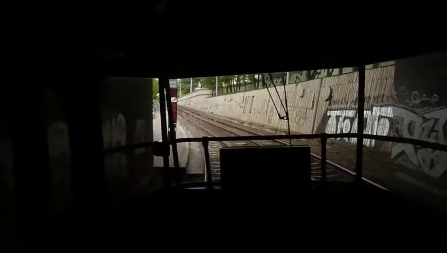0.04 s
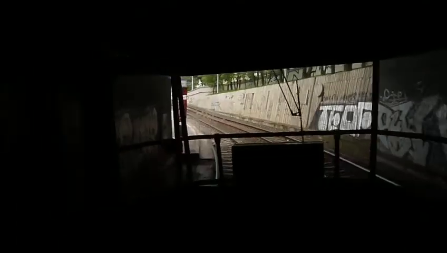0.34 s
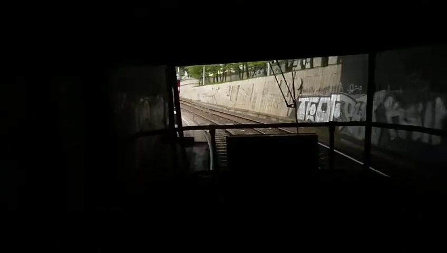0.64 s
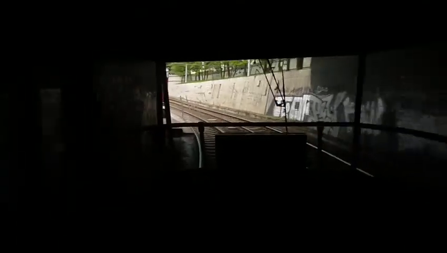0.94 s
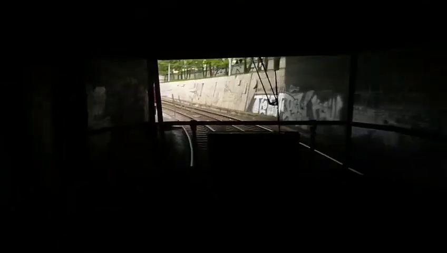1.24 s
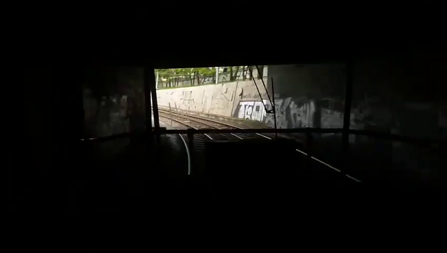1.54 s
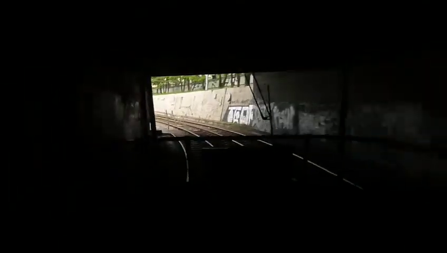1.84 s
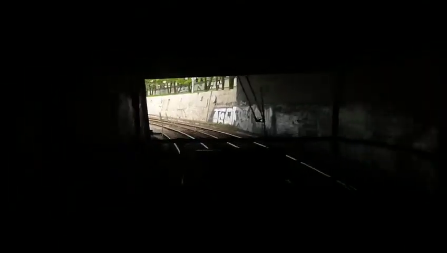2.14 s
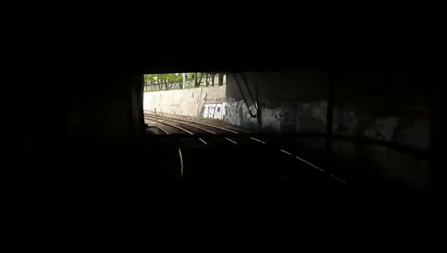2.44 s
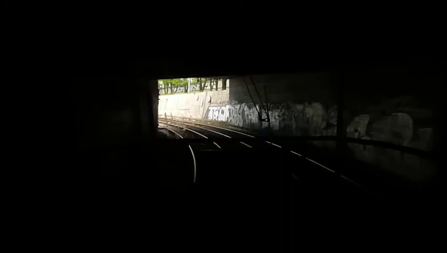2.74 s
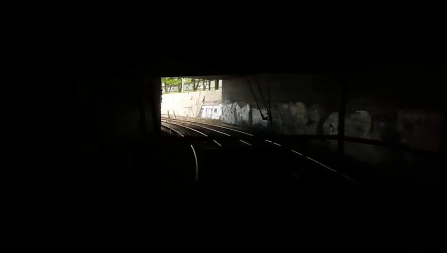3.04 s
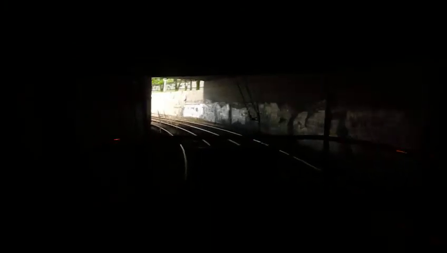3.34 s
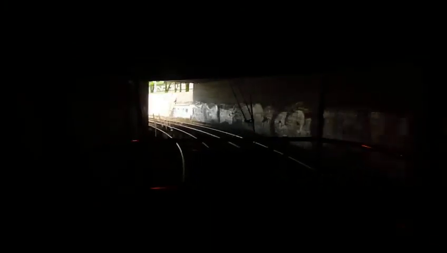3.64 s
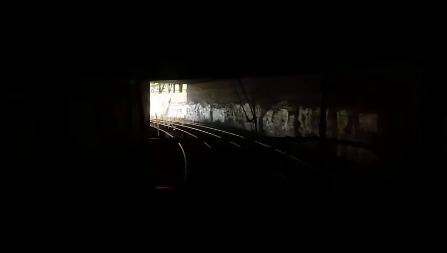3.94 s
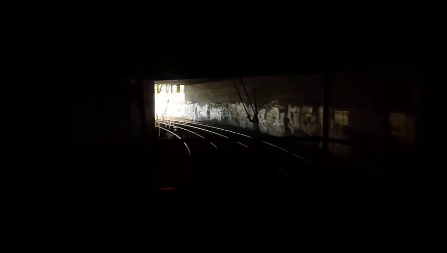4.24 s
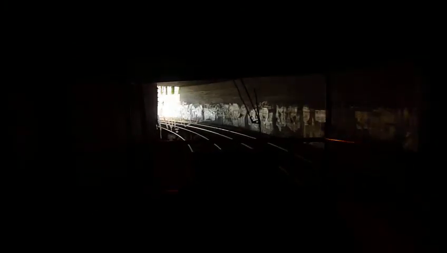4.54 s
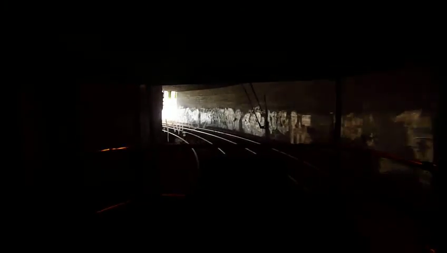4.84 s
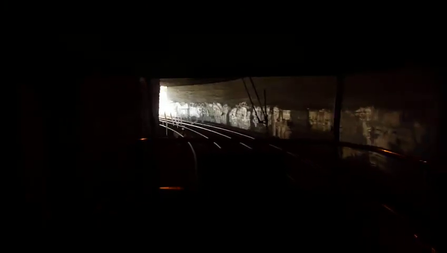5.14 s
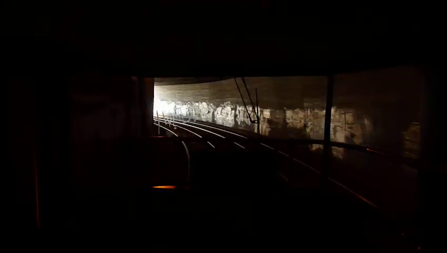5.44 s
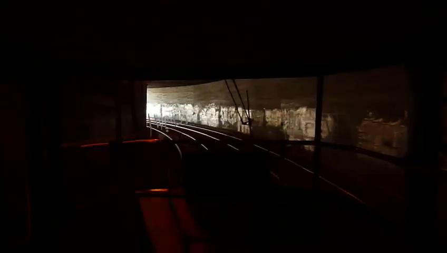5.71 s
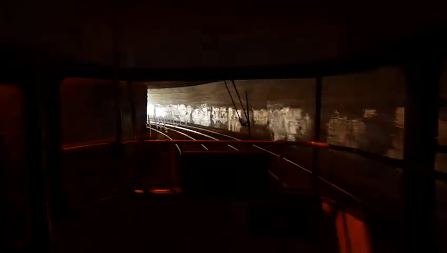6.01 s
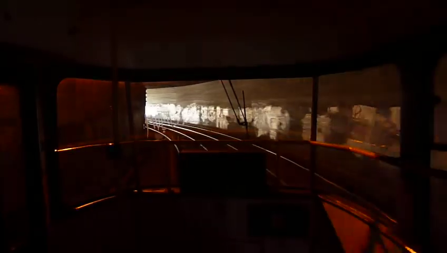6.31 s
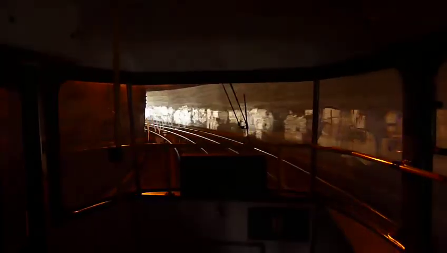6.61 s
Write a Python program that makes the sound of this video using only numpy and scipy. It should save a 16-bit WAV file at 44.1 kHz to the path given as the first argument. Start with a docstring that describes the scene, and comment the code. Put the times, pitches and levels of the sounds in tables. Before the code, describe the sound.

Inside a moving tram, an even low rumble and wheel roar carry on, with light knocks and faint metallic singing from the rails.

```python
"""Inside a tram that rolls at an even pace round a bend into a tunnel.
Rough rails shake the body into a deep rumble, and the air in the car booms. The wheels roar,
hiss and sing faintly in the curve, over a thin whine. Uneven spots give soft thumps and knocks.
A flange (the lip of a wheel) brushes the rail and, near the end, gives a thin double squeak."""
import sys
import numpy as np
from scipy.fft import rfft, irfft, next_fast_len
from scipy.io import wavfile
from scipy.ndimage import map_coordinates

SR = 44100
rng = np.random.default_rng(int(sys.argv[2]) if len(sys.argv) > 2 else 0)


def inscribe(sig):
    """Save sig as 16-bit PCM at rate SR to the path in sys.argv[1].

    A 1-D sig is mono; a 2-D sig holds one channel per row.
    Samples are clipped to [-1, 1] before scaling.
    """
    pcm = np.round(np.clip(np.atleast_2d(sig).T, -1, 1) * 32767)
    wavfile.write(sys.argv[1], SR, pcm.astype(np.int16))


N = 298424
T = np.arange(N) / SR


def body(rough_db):
    """Rough rail shakes the floor and wall panels into a deep rumble."""
    # The body shakes more or less on its springs. Each row: time in seconds, change in dB.
    sway = [(0, 2), (0.15, -1), (0.5, 1), (0.95, 1), (1.03, -2.5), (1.2, 1), (1.5, -2), (1.8, -0.5),
            (2.1, 0), (2.5, -0.5), (3.4, 0), (3.72, 1.5), (3.85, -4), (4.1, 0), (4.5, 0.5), (4.9, -0.5),
            (5.15, 1), (5.45, -0.5), (5.9, -0.5), (6.77, 0.5)]
    # Tone of the rumble. Each row: frequency in Hz, relative level in dB.
    rumble = [(10, -28.5), (22, -15), (42, -20.5), (55, -3), (100, -2), (250, 0), (400, -5.5), (530, -14.5),
              (900, -33), (2000, -64)]
    # Ringing panels. Each row: pitch in Hz, width in Hz, relative level in dB.
    panels = [(31, 6.5, -3.5), (59, 10, 3.5), (116.5, 20, 0.5), (181.6, 10, 1.5), (203, 14, -0.5),
              (259.8, 9, 0), (283.6, 8.3, -1), (346.4, 26, -3.5), (397, 16, -6), (466, 11, -4)]
    level_db = -30 + 0.8 * rough_db + curve(sway)
    shake = amp(-1.5) * noise(colour(rumble)) + amp(-2.5) * noise(resonances(panels))
    return amp(level_db + 0.32 * wobble(8.3)) * shake


def rolling(rough_db):
    """The wheels roar on the rail and make the steel ring."""
    # Tone of the roar. Each row: frequency in Hz, relative level in dB.
    roar = [(200, -17.5), (500, 2.5), (700, 3.5), (880, 1.5), (1100, -5.5), (1300, -4), (1720, -3),
            (1900, -7.5), (2300, -12.5), (3000, -29.5), (5000, -56.5)]
    # Ringing wheels and rails. Each row: pitch in Hz, width in Hz, relative level in dB.
    steel = [(587, 9.3, 8.5), (627, 20, 11), (703, 32, 4.5), (750, 8.9, 1.5), (874, 11, 1.5),
             (1206, 30, -8), (1287, 10, -4.5), (1397, 28, 0.5), (1506, 150, -4), (2913, 63, -10.5),
             (3215, 41, -14)]
    sound = amp(2.5) * noise(colour(roar)) + amp(-2.5) * noise(resonances(steel))
    return amp(-39 + rough_db + 0.51 * wobble(11)) * sound


def cabin():
    """The air in the car booms at two low pitches."""
    # Strength of each boom. Each row: time in seconds, level in dB.
    lower_boom = [(0, -40.5), (1.5, -38.5), (3.75, -37), (4.8, -39), (5.2, -35.5), (6.77, -35)]
    upper_boom = [(0, -44.5), (2.4, -38), (4.5, -43), (4.78, -38.5), (4.96, -30.5), (5.2, -41), (5.65, -36),
                  (5.92, -40.5), (6.12, -32.5), (6.42, -36.5), (6.7, -30)]
    lower = amp(curve(lower_boom)) * drone(hz=74.9, width_hz=4.95, swing_db=3.5)
    upper = amp(curve(upper_boom)) * drone(hz=135.1, width_hz=4.27, swing_db=2.5)
    return lower + upper


def bumps(rise_s=0.011, fade_s=0.074, ring_db=-3, shudder_db=-5):
    """Each uneven spot on the rail makes one panel ring briefly inside a dull shudder."""
    # Soft blows. Each row: start in seconds, length in seconds, level in dB, pitch in Hz.
    blows = [(0.363, 0.046, -25.5, 269), (0.558, 0.047, -28, 123), (0.63, 0.037, -29, 114),
             (0.686, 0.046, -26, 99.5), (0.88, 0.033, -29, 207), (1.477, 0.063, -29, 69),
             (1.784, 0.045, -28, 236), (1.975, 0.072, -29.5, 199), (2.115, 0.023, -26, 131),
             (2.365, 0.04, -24, 203), (2.829, 0.033, -27, 251), (2.818, .1, -32, 71.2),
             (3.472, 0.034, -28, 247), (3.59, 0.034, -29, 283), (3.685, 0.043, -28.5, 110),
             (3.719, .08, -29.5, 71.7), (3.941, .05, -27, 72), (4.055, 0.032, -26.5, 214),
             (4.298, 0.03, -23, 276), (5.305, 0.052, -27.5, 188), (5.985, 0.036, -28, 136),
             (6.586, 0.037, -28, 289)]
    out = np.zeros(N)
    for start, length, db, hz in blows:
        near = (T >= start) & (T < start + length + 2 * fade_s)
        age = T[near] - start
        ring = unit(np.sin(2 * np.pi * hz * age))
        shudder = noise(resonances([(hz, 0.57 * hz, 0), (2 * hz, hz, -17)]))[near]
        rise = 1 - np.exp(-age / rise_s)
        fade = amp(db - 60 * np.maximum(age - length, 0) / fade_s)
        out[near] += rise * fade * (amp(ring_db) * ring + amp(shudder_db) * shudder)
    return out


def clacks():
    """A wheel strikes hard spots and knocks through the frame that holds it."""
    # The knocks. Each row: start in seconds, length in seconds, level in dB.
    knocks = [(.365, 0.056, -36.5), (1.809, 0.043, -35), (2.02, 0.045, -33.5), (2.914, 0.062, -32.5),
              (4.292, 0.055, -34.5), (5.207, 0.038, -36)]
    # Tone of a knock. Each row: frequency in Hz, relative level in dB.
    knock_tone = [(250, -23), (500, -5), (640, 1), (900, -5), (1200, -15.5), (2500, -25), (5000, -37.5),
                  (7000, -55.5)]
    return swells(knocks) * noise(colour(knock_tone))


def chirps(stray_hz=14, flutter_db=2):
    """The flanges set the wheels singing in brief notes that sometimes overlap."""
    # The notes. Each row: start in seconds, length in seconds, level in dB, pitch in Hz.
    notes = [(.09, .1, -42, 1530), (1.46, 0.09, -57, 4130), (1.87, 0.3, -46.5, 1560),
             (2.04, .12, -55, 4120), (2.61, .1, -56, 4160), (4.08, .1, -59, 4180),
             (4.965, 0.098, -55, 4130), (4.965, 0.062, -42, 1760), (5.08, 0.12, -48, 1545),
             (5.12, 0.14, -45.5, 1650), (5.31, .07, -43, 1410), (5.425, 0.1, -43, 1540),
             (5.827, 0.079, -42, 1400), (5.968, 0.13, -39, 1405), (6.03, .08, -41, 1530)]
    stray = 2 * np.pi * np.cumsum(stray_hz * wobble(90)) / SR
    tones = sum(amp(db) * arch(start, length) * np.sin(2 * np.pi * hz * T + stray)
                for start, length, db, hz in notes)
    return amp(flutter_db * wobble(60)) * tones


def scrub(rough_db):
    """The wheels slip sideways in the bend and hiss; a brushing flange adds short scrapes."""
    # Tones of the hiss and the scrapes. Each row: frequency in Hz, relative level in dB.
    hiss_tone = [(1000, -23), (2000, 3.5), (2800, 0.5), (3600, -3.5), (4400, -5), (4900, -9.5), (5600, -11),
                 (6200, -17.5), (6750, -22.5), (7100, -31), (7500, -44)]
    scrape_tone = [(1000, -21.5), (2100, 4), (2900, 0), (3800, -7.5), (5500, -14), (6500, -21.5),
                   (7500, -42.5)]
    # High wheel notes stirred by the slip. Each row: pitch in Hz, width in Hz, relative level in dB.
    high_notes = [(3830, 50, 0), (5100, 77, -4.5), (5410, 90, -5.5)]
    # The flange brushes the rail. Each row: start in seconds, length in seconds, level in dB.
    scrapes = [(0.85, 0.082, -50), (1.002, 0.21, -51.5), (1.3, 0.1, -52), (1.773, 0.22, -49),
               (2.51, 0.17, -50.5), (2.715, 0.14, -47), (2.955, 0.064, -50)]
    level_db = -49.5 + 0.91 * rough_db + 0.62 * wobble(16)
    hiss = noise(colour(hiss_tone)) + amp(-20.5) * noise(resonances(high_notes))
    return amp(level_db) * hiss + swells(scrapes) * noise(colour(scrape_tone))


def gears(rough_db):
    """A faint whine, most likely from the drive gears, flutters behind the roar."""
    return amp(-53.5 + 0.91 * rough_db) * drone(hz=1545, width_hz=24, swing_db=3)


def squeak(full_grip_hz=5680, sag_hz=110, stutter_db=2):
    """A flange catches the rail twice and rings a high note that sags as the grip lets go."""
    # The catches. Each row: start in seconds, length in seconds, level in dB.
    catches = [(6.645, 0.027, -57), (6.688, 0.058, -57)]
    grip = sum(arch(start, length) for start, length, _ in catches)
    hz = full_grip_hz - sag_hz * (1 - grip)
    level = swells(catches) * amp(stutter_db * wobble(220))
    return level * unit(wandering(hz, width_hz=92, rate=600))


def rims(rough_db, drift_hz=16, flicker_db=4):
    """The rims of the two front wheels sing in quick flickers, each at its own wavering pitch."""
    # They ring most on the way into the bend. Each row: time in seconds, base level in dB.
    ringing = [(0, -61), (1.0, -60.5), (1.5, -61.5), (2.3, -60), (3.3, -62.5), (3.9, -65.5), (6.77, -64)]
    # The two wheels. Each row: pitch in Hz, relative level in dB.
    wheels = [(4115, -2), (4205, -2.5)]
    song = np.zeros(N)
    for hz, db in wheels:
        level = amp(db + flicker_db * wobble(40))
        song += level * wandering(hz + drift_hz * wobble(8), width_hz=36, rate=170)
    return amp(curve(ringing) + 0.7 * rough_db) * unit(song)


def amp(db):
    """Turn decibels into a number to multiply by."""
    return 10 ** (np.asarray(db) / 20)


def unit(x):
    """Scale x to an average strength (rms) of 1."""
    return x / np.sqrt(np.mean(x ** 2) + 1e-20)


def curve(rows):
    """Join (time, value) points with straight lines."""
    return np.interp(T, *np.transpose(rows))


def wobble(rate):
    """A smooth random curve through `rate` points a second."""
    return map_coordinates(rng.standard_normal(int(T[-1] * rate) + 4), [T * rate])


def arch(start_s, length_s):
    """A level that swells and fades once."""
    return np.sin(np.pi * np.clip((T - start_s) / length_s, 0, 1))


def swells(rows):
    """One arch for each (start, length, dB) row, added up."""
    return sum(amp(db) * arch(start, length) for start, length, db in rows)


def filtered(x, response):
    """Turn each frequency in x up or down as the response says."""
    size = next_fast_len(N + SR // 2)
    return irfft(rfft(x, size) * response(np.fft.rfftfreq(size, 1 / SR)), size)[:N]


def colour(points):
    """A broad response that joins (Hz, dB) points."""
    freqs, db = np.transpose(points)
    return lambda hz: amp(np.interp(np.log(hz + 1), np.log(freqs), db))


def resonances(peaks):
    """A response with a steep peak for each (pitch, width, dB) row."""
    return lambda hz: np.sqrt(sum(amp(db) ** 2 / (1 + ((hz - pitch) / (np.pi * width / 4)) ** 2) ** 2
                                  for pitch, width, db in peaks))


def noise(response):
    """Random shaking of strength 1, shaped by a response."""
    return unit(filtered(rng.standard_normal(N), response))


def wandering(hz, width_hz, rate):
    """A tone whose pitch strays at random."""
    return np.sin(2 * np.pi * np.cumsum(hz + width_hz * wobble(rate)) / SR)


def drone(hz, width_hz, swing_db):
    """A held tone whose pitch wanders and whose loudness swings."""
    return unit(amp(swing_db * wobble(14)) * wandering(hz, width_hz, rate=30))


def scene():
    """Everything heard in the car: rougher rail makes the rumble, wheels and whine louder."""
    # Roughness of the rail. Each row: time in seconds, change from the usual in dB.
    track = [(0.0, 0.5), (0.14, 1.2), (0.38, 1.1), (0.58, -1), (0.95, -0.5), (1.35, 1.3), (1.55, -1.5),
             (1.75, -0.5), (1.85, 2.5), (2.06, 0.2), (2.22, -1.1), (2.48, -0.5), (2.75, 0.6), (2.98, -1),
             (3.18, -2), (3.4, -1.8), (3.78, -0.85), (4.42, -2), (4.8, 0.2), (5.13, 3), (5.42, -0.2),
             (5.85, 2.5), (6.06, 2), (6.2, 0), (6.77, 1.8)]
    rough_db = curve(track) + 0.36 * wobble(10)
    floor = body(rough_db) + bumps() + clacks()
    wheels = rolling(rough_db) + scrub(rough_db) + rims(rough_db) + chirps() + squeak()
    return (floor + cabin() + wheels + gears(rough_db))[None]


def record(dry):
    """Cut off the highest treble."""
    top_hz = 7450
    return filtered(dry[0], lambda hz: 1 / np.sqrt(1 + (hz / top_hz) ** 200))[None]


dry = scene()
out = record(dry)
inscribe(out)
```